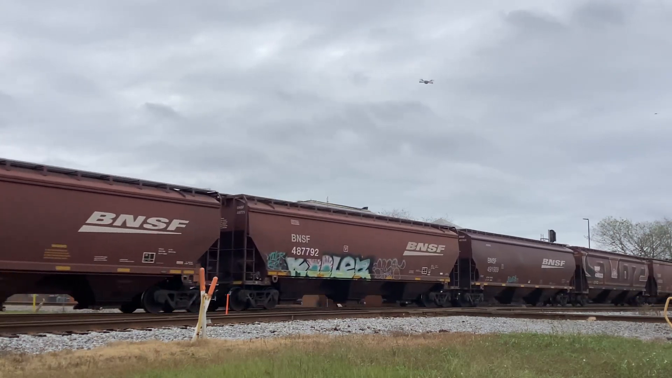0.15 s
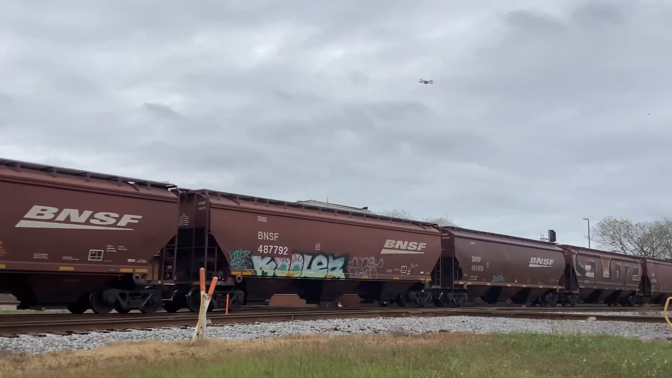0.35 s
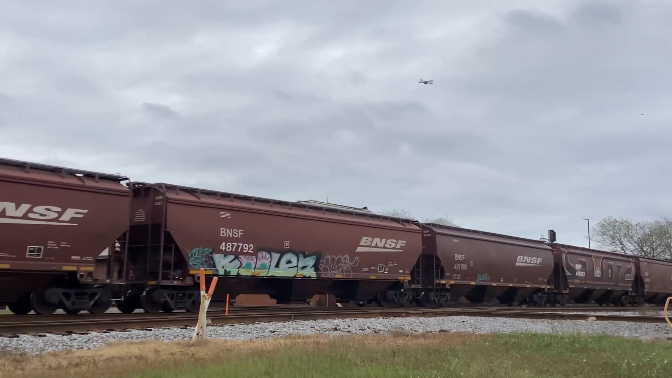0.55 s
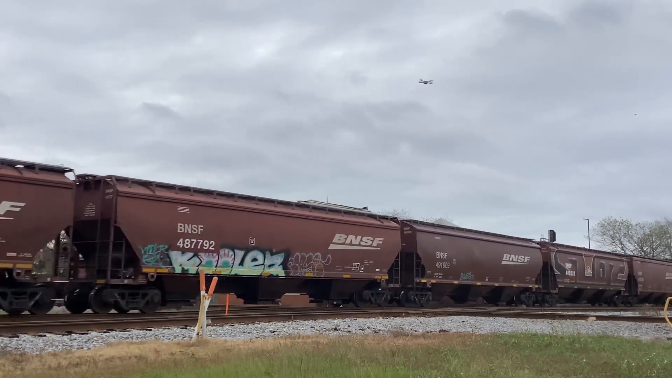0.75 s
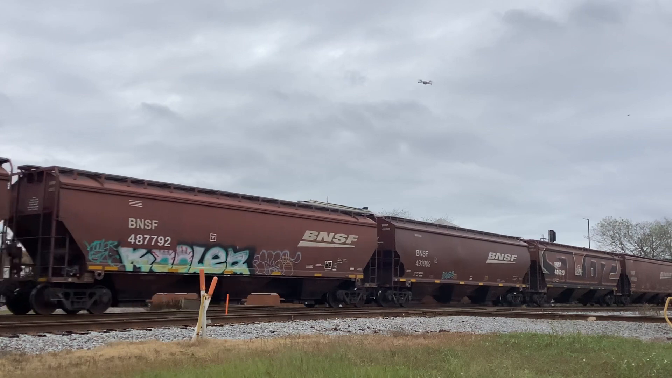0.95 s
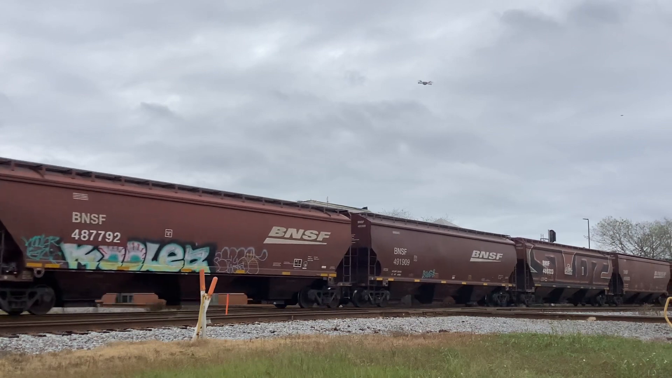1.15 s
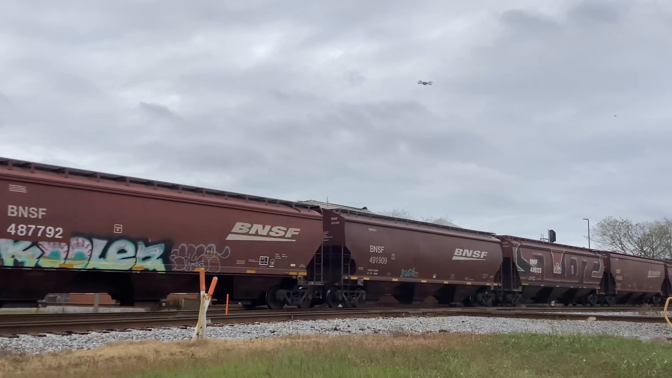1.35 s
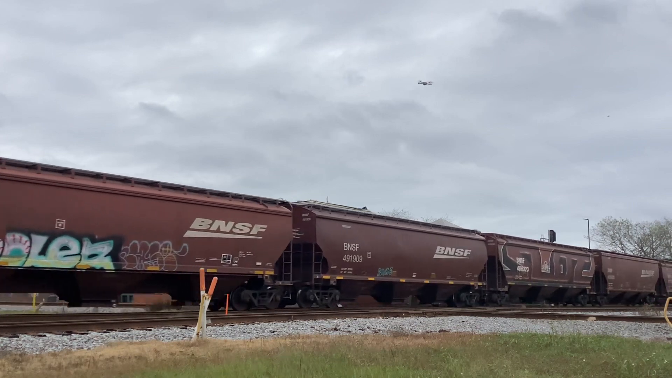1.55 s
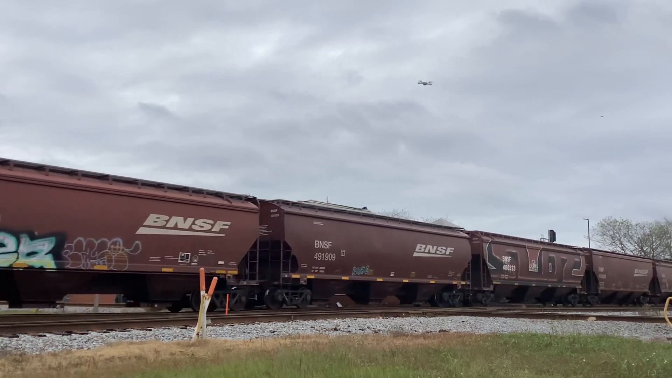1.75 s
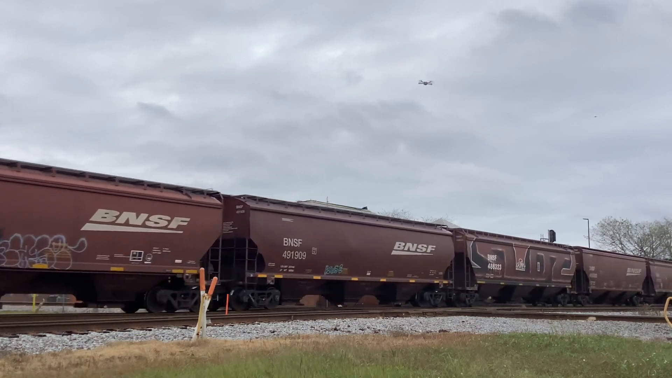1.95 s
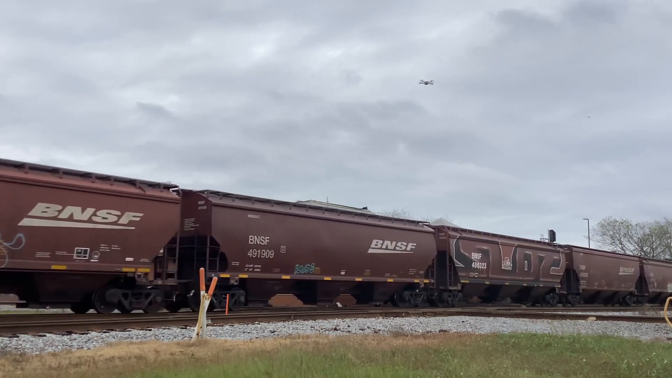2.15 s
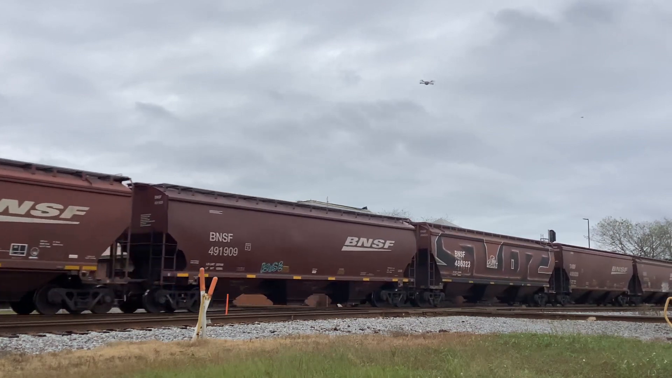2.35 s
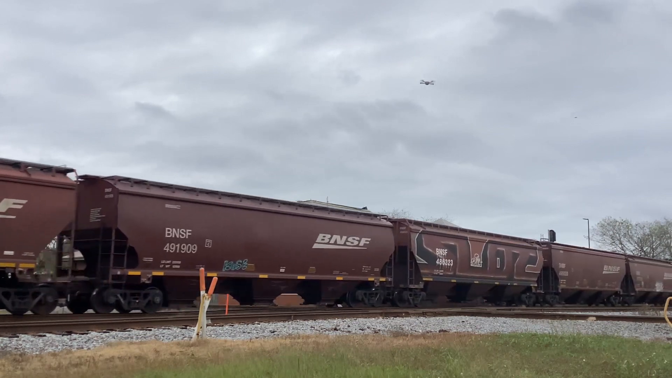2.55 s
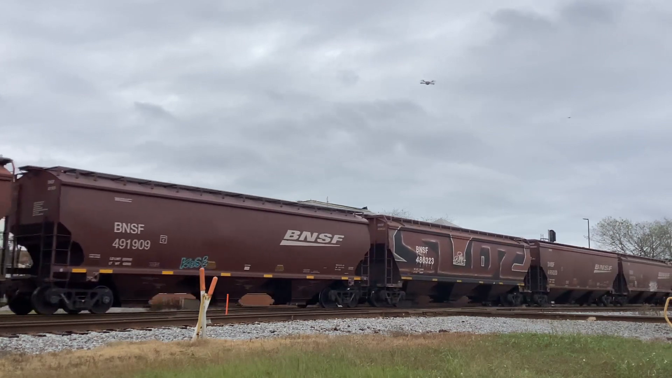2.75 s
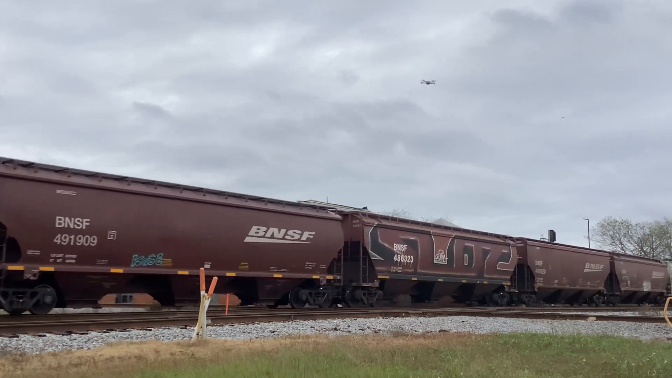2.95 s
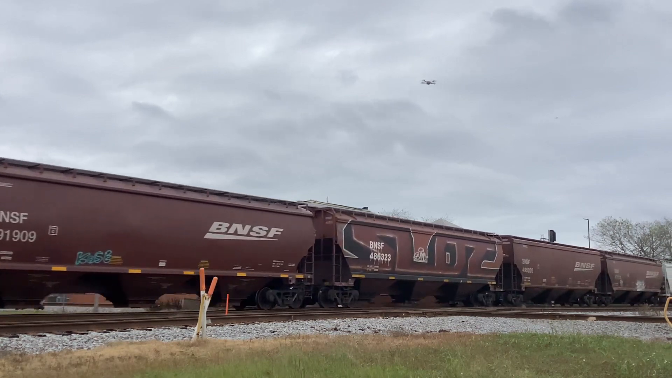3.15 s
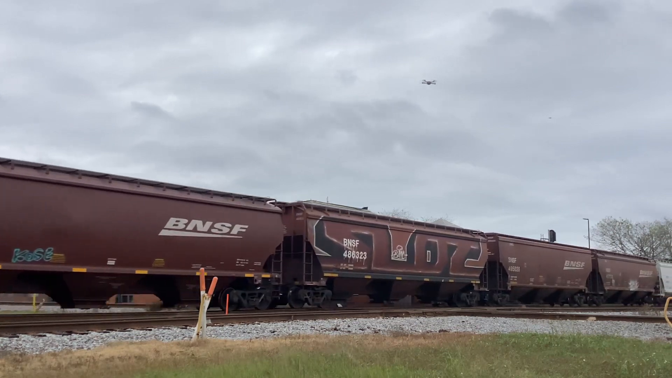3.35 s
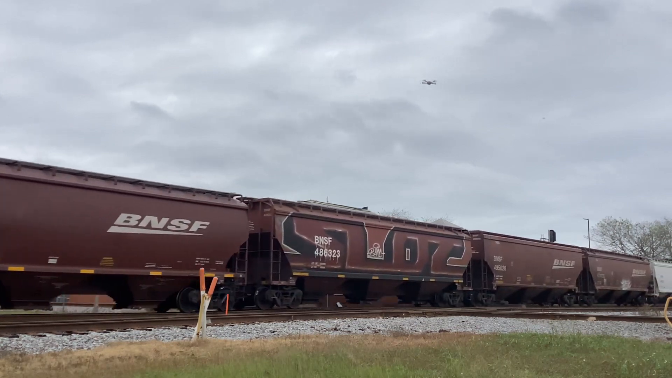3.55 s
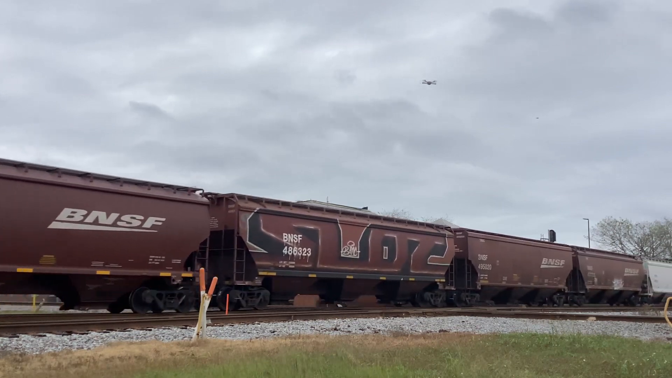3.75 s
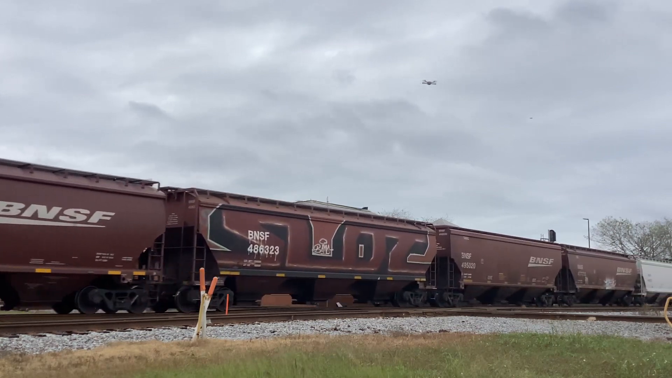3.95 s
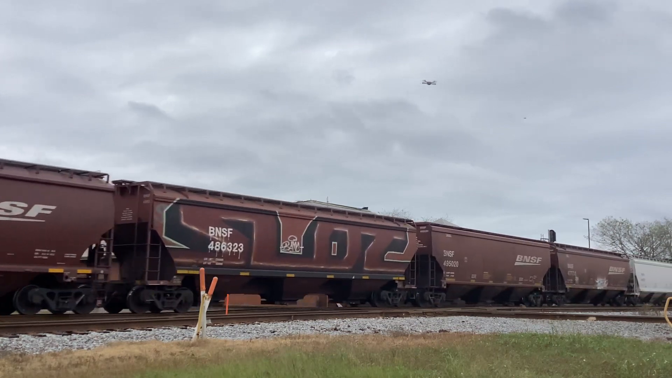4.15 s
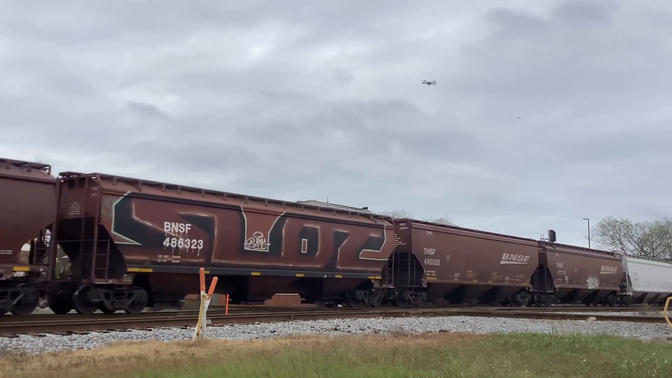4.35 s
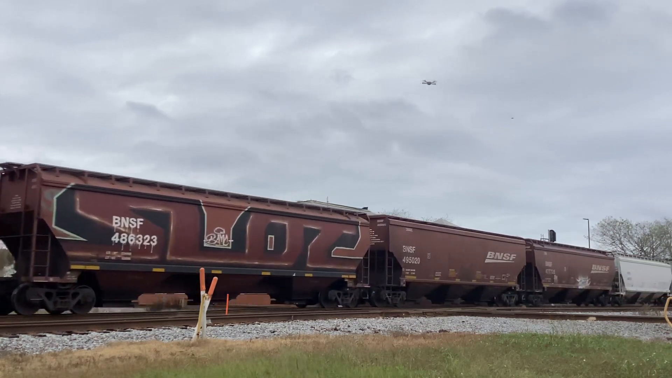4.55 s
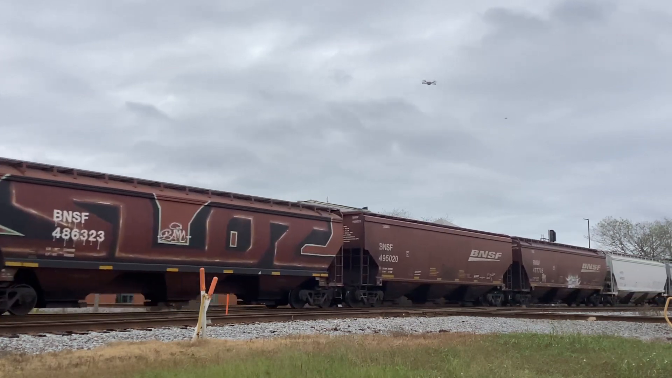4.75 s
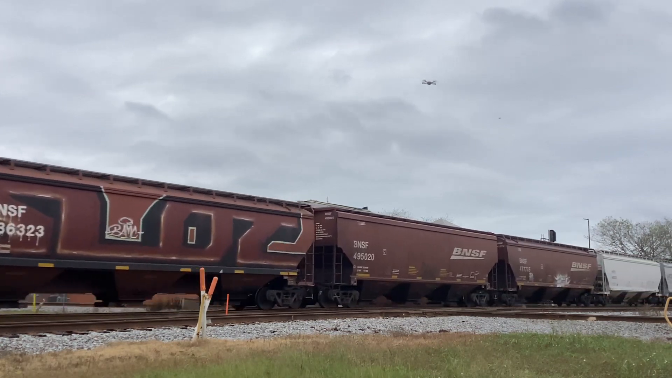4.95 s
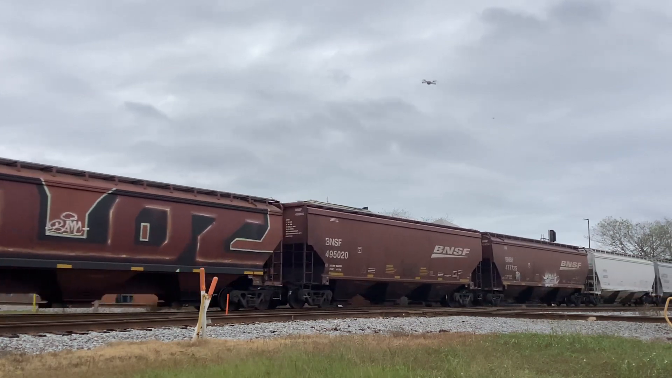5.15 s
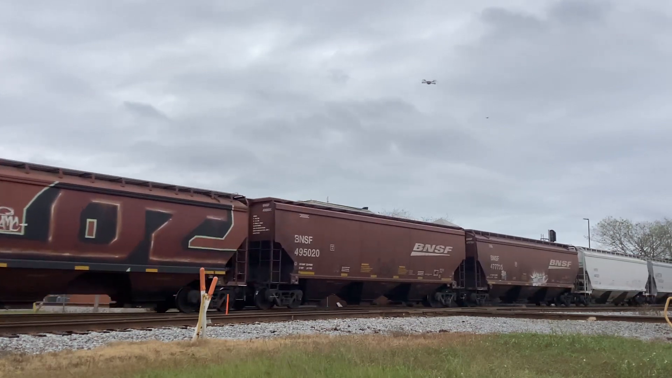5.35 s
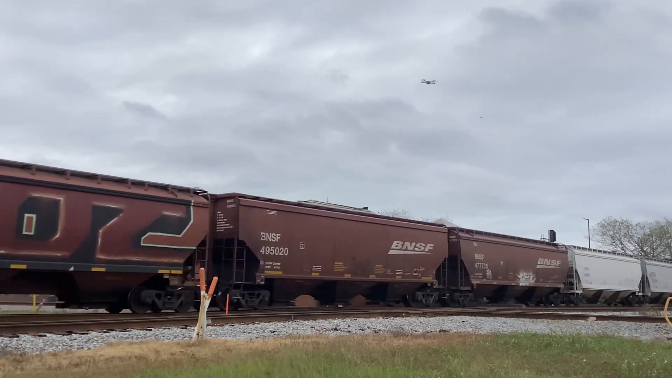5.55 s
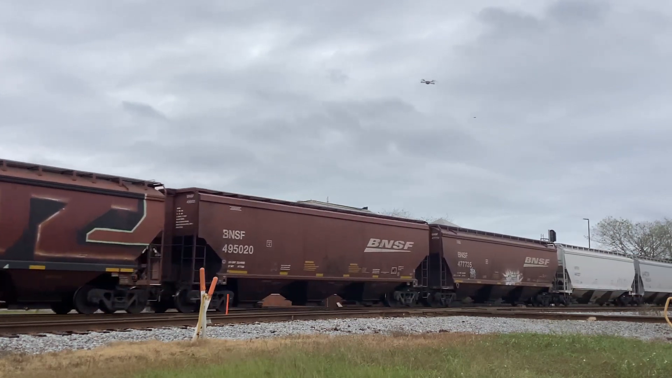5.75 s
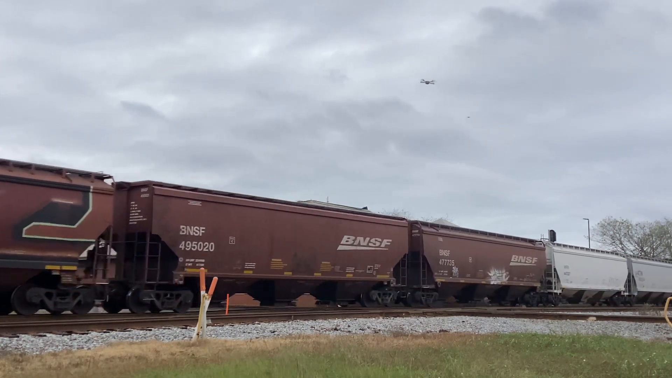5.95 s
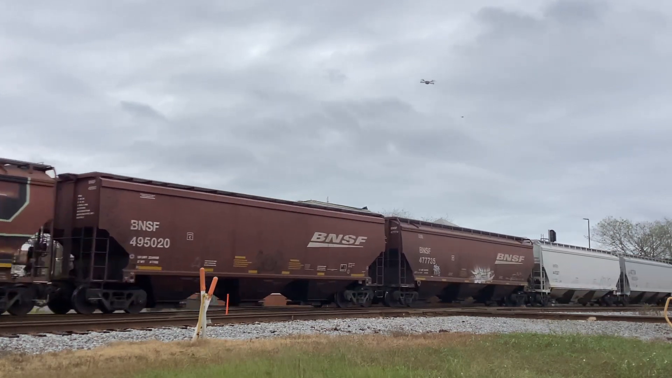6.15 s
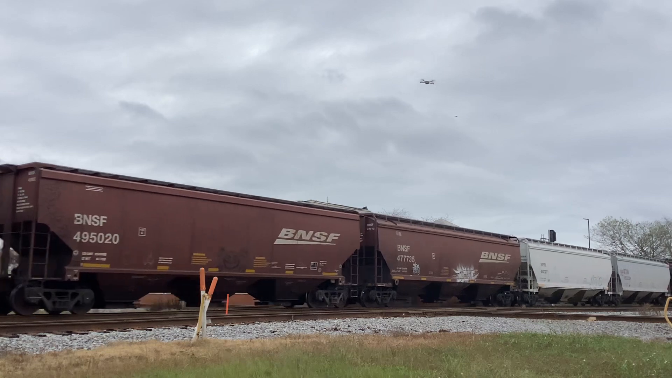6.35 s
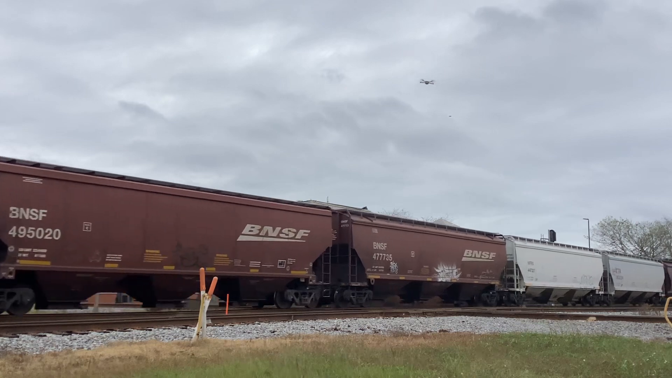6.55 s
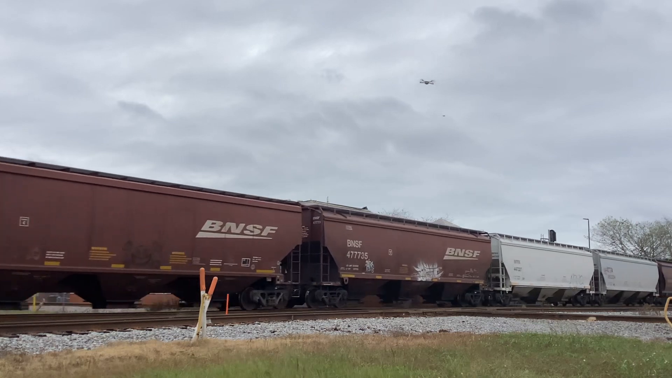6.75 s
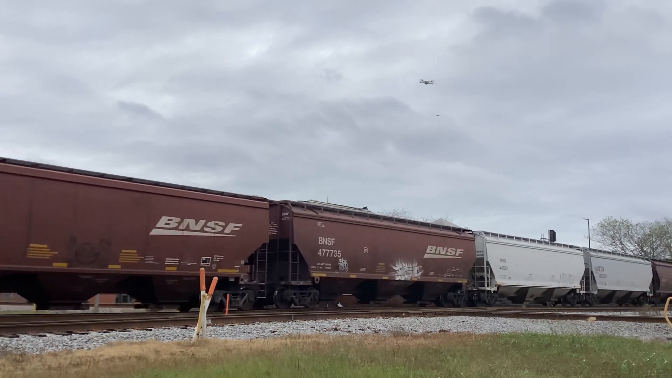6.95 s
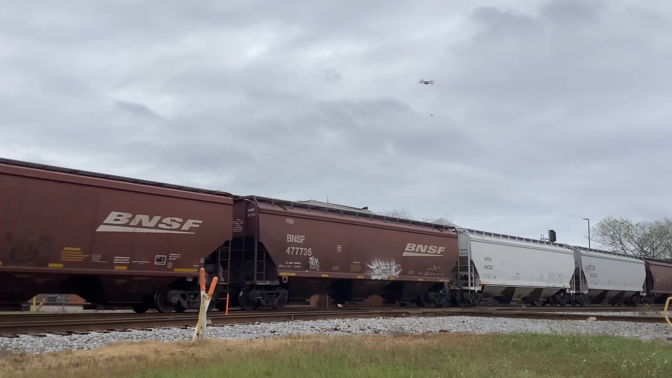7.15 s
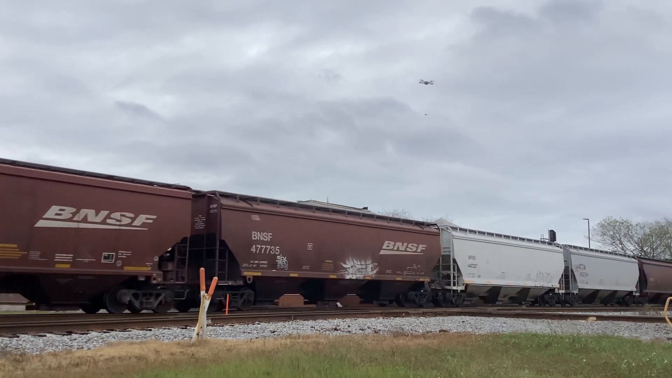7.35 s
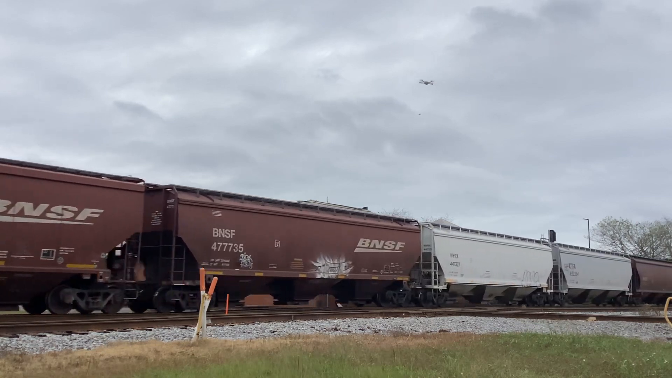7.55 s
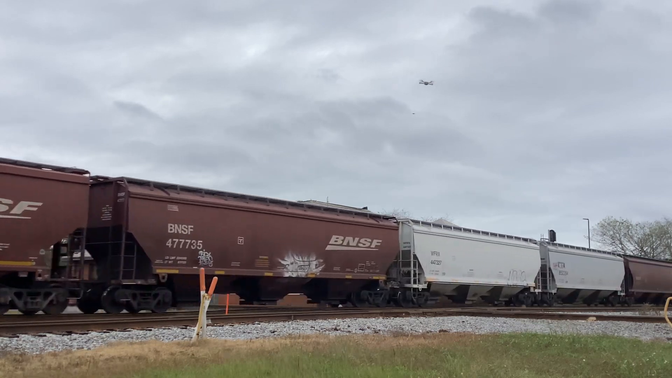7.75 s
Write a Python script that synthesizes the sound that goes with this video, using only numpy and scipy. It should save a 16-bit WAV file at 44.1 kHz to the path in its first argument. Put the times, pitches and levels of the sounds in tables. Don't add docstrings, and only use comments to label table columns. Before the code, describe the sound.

Close trackside pass of a long goods train: four groups of booming metallic double clanks over steady rumble and hiss, opening with pulsing wheel squeal.

```python
import sys
import numpy as np
from scipy import signal
from scipy.fft import rfft, irfft, next_fast_len
from scipy.io import wavfile

SR = 44100
rng = np.random.default_rng(int(sys.argv[2]) if len(sys.argv) > 2 else 0)


def unload_wav(signal):
    wavfile.write(
        sys.argv[1],
        SR,
        np.round(np.clip(np.atleast_2d(signal).T, -1, 1) * 32767).astype(np.int16),
    )


def to_linear_factor(level_db):
    exponent = np.asarray(level_db, float) / 20
    return 10 ** exponent


N = 343539


def rms_one(x):
    return x / np.sqrt(np.mean(x ** 2) + 1e-20)


def drift(rate_hz, size=N):
    r = np.exp(-80 * np.pi * rate_hz / SR)
    white = rng.standard_normal(size // 40 + 2002)
    slow = signal.lfilter([1], [1, -2 * r, r * r], white)[2000:]
    return np.interp(np.arange(size) / 40, np.arange(len(slow)), rms_one(slow))


def coloured(spectrum, patchy_db, count, shared=0.68, rate_hz=15.0):
    size = next_fast_len(N)
    hz, db = np.transpose(spectrum)
    log_hz = np.log(np.arange(1, size // 2 + 2) * SR / size)
    bins = rfft(rng.standard_normal(size)) * to_linear_factor(np.interp(log_hz, np.log(hz), db, -120, -120))
    centres = np.linspace(np.log(hz[0]), np.log(hz[-1]), count)
    together = drift(10.8)
    out = 0
    for k in range(count):
        share = np.interp(log_hz, centres, np.arange(count) == k)
        flicker_db = patchy_db * (shared * together + drift(rate_hz))
        out = out + irfft(bins * share, size)[:N] * to_linear_factor(flicker_db)
    return rms_one(out)


def clicks(s, db):
    train = np.full(N, 1e-18)
    train[np.round(np.asarray(s) * SR).astype(int)] = to_linear_factor(db)
    return train


def swell(train, rise_s, t60_s, tail_t60_s, tail_db):
    fast, tail = [signal.lfilter([1], [1, -to_linear_factor(-120 / (t * SR))], train ** 2) for t in (t60_s, tail_t60_s)]
    r = np.exp(-1 / (rise_s * SR))
    return np.sqrt(signal.lfilter([(1 - r) ** 2], [1, -2 * r, r * r], fast + to_linear_factor(2 * tail_db) * tail))


def approach(train, lead_s, lead_db):
    backwards = signal.lfilter([1], [1, -np.exp(-1 / (lead_s * SR))], train[::-1])
    return to_linear_factor(lead_db) * backwards[::-1]


def ring(train, hz, t60_s):
    r, w = to_linear_factor(-60 / (t60_s * SR)), 2 * np.pi * hz / SR
    return signal.lfilter([0, np.sin(w)], [1, -2 * r * np.cos(w), r * r], train)


def add(out, s, sound):
    at = round(s * SR)
    out[at:at + len(sound)] += sound[:N - at]


def blow_rows():
    # (time at first gap [s], first blow [dB], second blow [dB])
    axles = [(0.934, -6, -7), (1.119, -8, -7.5), (1.329, -8.5, -5.5), (1.513, -9.5, -7), (2.68, -7, -3.5),
             (2.865, -11.5, -8), (3.082, -9, -5), (3.258, -9.5, -6), (4.481, -5.5, -3.5), (4.662, -5.5, -6),
             (4.879, -5, -5), (5.058, -6, -6.5), (6.195, -5.5, -3), (6.376, -8, -8.5), (6.595, -5.5, -6),
             (6.771, -5, -4.5)]
    # (extra boom [dB], extra treble [dB], extra wagon body [dB])
    wheels = [(-3.5, 1.5, -1), (1, 1.8, 1.5), (2, 1, -1), (-7, 0.3, 4.5), (0.5, -1, -3.5), (-2, -0.5, -0.5),
              (-1, 0, 1.5), (-1, -2, 2), (-1, 1, 1), (2.3, 1.5, 1.5), (-2, 0.2, 2), (4, -1, 3.5),
              (-0.5, 1.8, 1.5), (-0.5, 4.5, 2), (1, 1, -1), (-1, 0.8, -3)]
    # (boom [dB], treble [dB], wagon body [dB])
    shake = [
        (-14, -16.5, -18.5),
        (-12.5, -15, -16.5),
        (-16.5, -19, -21.5),
        (-15, -17, -17),
        (-15.5, -16.5, -21.5),
        (-14.5, -16, -16),
        (-13.5, -15, -20.5),
        (-18, -14.5, -21),
    ]
    gap_lag_s, lag_shrink_per_s = 0.1425, 0.0007
    hits = []
    for (s, first_db, second_db), extra_db in zip(axles, wheels):
        hits.append((s, first_db, *extra_db))
        hits.append((s + gap_lag_s - lag_shrink_per_s * s, second_db, *extra_db))
    shared = [(0, 0, *shake_db) for shake_db in shake]
    return np.array(hits) + np.tile(shared, (len(hits) // len(shake), 1))


def crashes():
    # (time [s], peak [dB], treble [dB])
    knocks = [
        (0.209, -36, -32),
        (0.359, -17, -24),
        (2.036, -32, -45),
        (2.3, -31, -32),
        (2.37, -31, -39),
        (3.719, -19.5, -23.5),
        (5.489, -28, -31),
        (5.659, -26, -21.5),
        (5.739, -15, -40),
        (7.519, -27, -25),
    ]
    # (frequency [Hz], density [dB per Hz])
    boom_colour = [(15, -59), (25, -50), (59, 2), (129, 1.5), (175, -0.5), (231, -6.5), (284, -20),
                   (325, -33), (450, -26), (580, -25), (990, -120)]
    body_colour = [(140, 1), (230, -4.5), (285, 4), (323, 0.5), (471, -12.5), (700, -5), (910, -35),
                   (1540, -120)]
    crash_colour = [(350, -2), (600, 0.5), (879, -1), (992, 1), (1200, -1), (1630, 1), (1860, 0.5),
                    (2150, -5), (2750, -4.5), (2980, -9), (3320, -12), (3600, -13.5), (4680, -44),
                    (7920, -120)]
    splash_colour = [(1880, -34), (3200, 0), (3610, -21), (3920, 0), (4270, -3), (5200, 4), (6320, -2),
                     (7780, 1), (8910, -3), (9400, 3), (9790, 2), (13200, -10), (15000, -20), (16000, -35)]
    s, crash_db, boom_db, treble_db, body_db = np.transpose(blow_rows())
    knock_s, knock_db, knock_treble_db = np.transpose(knocks)

    low = clicks(s, boom_db - 5.5)
    boom = np.hypot(swell(low, 0.0058, 0.32, 1.0, -3), approach(low, 0.015, -1.0))
    boom = boom * coloured(boom_colour, 2.7, count=4)

    panel = clicks(s, body_db)
    body = np.hypot(swell(panel, 0.0042, 0.21, 0.27, -14.0), approach(panel, 0.011, -1.5))
    body = body * coloured(body_colour, 2.0, count=2)

    mid = clicks(s[::2], crash_db[::2] - 8.5) + clicks(knock_s, knock_db - 16.0)
    crash = np.hypot(swell(mid, 0.001, 0.35, 1.0, -15.0), approach(mid, 0.022, -11.5))
    worn = clicks(s[1::2] - 0.002, crash_db[1::2] - 9.5)
    worn_burst = np.hypot(swell(worn, 0.0022, 0.39, 0.94, -11.0), approach(worn, 0.013, -7))
    crash = np.hypot(crash, worn_burst) * coloured(crash_colour, 1.5, count=7)

    treble = clicks(s - 0.0025, treble_db - 2) + clicks(knock_s, knock_treble_db - 7.5)
    splash = swell(treble, 0.0043, 0.42, 1.0, -6.5) * coloured(splash_colour, 0.99, count=6)

    clatter = to_linear_factor(0.88 * drift(75))
    return boom + body + clatter * (crash + splash)


def thuds():
    # (time of peak [s], peak [dB], frequency [Hz])
    gives = [(0.95, -12, 162), (1.092, -6.5, 184), (1.114, -13, 179), (1.135, -8.5, 207), (1.174, -16, 147),
             (1.265, -9, 197), (1.291, -10, 127), (1.347, -6.5, 190), (1.399, -16, 108), (1.487, -11, 219),
             (1.511, -12, 170), (1.535, -5, 140), (1.668, -9.5, 207), (2.706, -8, 125), (2.837, -7.5, 180),
             (2.882, -4.5, 167), (2.915, -12, 122), (3.018, -24, 206), (3.062, -10, 131),
             (3.094, -2.5, 145), (3.234, -8, 146), (3.273, -13, 163), (3.314, -10, 104), (3.362, -14, 131),
             (3.391, -15, 114), (4.501, -11, 120), (4.635, -17, 191), (4.68, -5, 151), (4.713, -19, 113),
             (4.831, -6, 116), (4.87, -13, 112), (4.899, -11, 141), (4.916, -21, 110), (5.038, -14, 170),
             (5.071, -4, 128), (5.093, -18, 184), (5.124, -10, 120), (5.21, -9, 191), (5.236, -6.5, 109),
             (6.213, -11.5, 131), (6.348, -11, 156), (6.368, -16, 183), (6.396, -10, 132), (6.416, -9, 97),
             (6.53, -11, 203), (6.547, -10, 115), (6.565, -12, 130), (6.606, -5, 196), (6.637, -11.5, 126),
             (6.701, -17, 109), (6.744, -4.5, 166), (6.787, -5.5, 165), (6.81, -13, 158), (6.923, -9, 155)]
    cycles_to_peak, sag = 1.203, 0.21
    out, t = np.zeros(N), np.arange(round(0.12 * SR)) / SR
    for (s, peak_db, hz), phase in zip(gives, rng.random(len(gives))):
        rise_s = cycles_to_peak / hz
        turns = hz * ((1 - sag) * t + 3 * sag * rise_s * (1 - np.exp(-t / rise_s)))
        push = (t / rise_s) ** 2 * np.exp(2 - 2 * t / rise_s)
        add(out, s - rise_s, to_linear_factor(peak_db) * push * np.sin(2 * np.pi * (turns + phase)))
    return out


def steel():
    # (frequency [Hz], level [dB], rattle t60 [s])
    steel_modes = [(986, -30.5, 0.34), (1635, -25, 0.31), (1852, -34.5, 1), (2602, -23, 0.71),
                   (5100, -28, 0.96), (5500, -33, 0.32), (9740, -16, 0.33)]
    mode_t60_s = [.06, .06, .08, .035, .025, .02, .008]
    s, crash_db = np.transpose(blow_rows())[:2]
    spread_db = 3 * rng.standard_normal((len(s), len(steel_modes)))
    out = 0
    for k, (hz, level_db, rattle_t60_s) in enumerate(steel_modes):
        train = clicks(s, crash_db + level_db + spread_db[:, k] - 21.5)
        rattle = swell(train, 0.0072, rattle_t60_s, 1.0, -4)
        out = out + ring(rattle * rng.standard_normal(N), hz, mode_t60_s[k])
    return out


def wheel_notes():
    # (time [s], frequency [Hz], peak [dB], t60 [s])
    clear_notes = [(1.078, 5167, -23, 0.11), (1.263, 5280, -21, 0.07), (1.324, 1894, -23, 0.08),
                   (2.676, 1640, -17, 0.063), (2.684, 2460, -23, 0.1), (2.82, 948, -18, 0.13),
                   (2.824, 1648, -23, 0.33), (2.86, 1625, -21, 0.23), (2.881, 1141, -21, 0.09),
                   (3.077, 1590, -21, 0.08), (3.083, 432, -19.5, 0.16), (3.169, 1475, -21.5, 0.08),
                   (3.215, 633, -18, 0.068), (3.261, 1890, -20, 0.15), (3.394, 1894, -32, 0.12),
                   (4.615, 1076, -19, 0.14), (4.627, 1680, -22, 0.08), (4.651, 2620, -29, 0.09),
                   (4.669, 1600, -20, 0.097), (4.895, 1005, -22, 0.09), (4.899, 2830, -17, 0.09),
                   (4.931, 1000, -22, 0.22), (5.015, 1880, -24, 0.08), (6.326, 1830, -24, 0.35),
                   (6.523, 1850, -25, 0.16), (6.595, 1674, -16, 0.14), (6.597, 745, -17, 0.099),
                   (6.733, 1900, -15, 0.1), (6.769, 1426, -13.5, 0.076), (6.906, 1442, -16, 0.11),
                   (6.906, 1837, -24, 0.16)]
    out, t = np.zeros(N), np.arange(round(0.3 * SR)) / SR
    for (s, hz, peak_db, t60_s), phase in zip(clear_notes, rng.random(len(clear_notes))):
        note = (1 - np.exp(-t / 0.0029)) ** 2 * to_linear_factor(-60 * t / max(t60_s, 0.04))
        add(out, s, to_linear_factor(peak_db + 2.0) * note / note.max() * np.sin(2 * np.pi * (hz * t + phase)))
    hum = np.sin(np.pi * t / 0.3) ** 2 * to_linear_factor(-60 * t / 0.5) * np.sin(2 * np.pi * 350 * t)
    for s, *_ in blow_rows()[7:16:8]:
        add(out, s, to_linear_factor(-15.5) * hum)
    return out


def wheel_modes(count):
    out, t = np.zeros(N), np.arange(round(0.2 * SR)) / SR
    rows = blow_rows()
    chance = rng.random((len(rows), 4, count, 1))
    for (s, crash_db, _, treble_db, _), (pitch, strength, damping, phase) in zip(rows, chance):
        hz = 450 * (12000 / 450) ** pitch ** 0.65
        level_db = crash_db - 21.5 + pitch * (treble_db - crash_db + 8) - 12 * strength
        fall = to_linear_factor(level_db - 60 * t / (0.091 + 0.25 * damping))
        tones = np.sum(fall * np.sin(2 * np.pi * (hz * t + phase)), axis=0)
        add(out, s, (1 - np.exp(-t / 0.0062)) * tones)
    return out


def squeal(rows, glide_hz, wobble_hz, flutter_db, skirt_hz, above_hz):
    start, end = round(rows[0][0] * SR), round(rows[-1][0] * SR)
    step = np.arange(end - start)
    s, *levels_db = np.transpose(rows)
    tone_db, skirt_db = [np.interp((start + step) / SR, s, db) for db in levels_db]
    fade = np.minimum(step + (start == 0) * SR, step[::-1]) / (0.016 * SR)
    hz = np.linspace(*glide_hz, len(step)) + wobble_hz * drift(21.1, size=len(step))
    tone_amp = np.sqrt(2) * to_linear_factor(tone_db + flutter_db * drift(35, size=len(step)))
    tone = tone_amp * np.sin(2 * np.pi * np.cumsum(hz) / SR)
    centre_hz = np.mean(glide_hz) + above_hz
    band_hz = [centre_hz - skirt_hz / 2, centre_hz + skirt_hz / 2]
    band = signal.butter(2, band_hz, "band", fs=SR, output="sos")
    skirt = to_linear_factor(skirt_db) * rms_one(signal.sosfilt(band, rng.standard_normal(len(step))))
    return np.pad(np.clip(fade, 0, 1) * (tone + skirt), (start, N - end))


def with_skirt(rows, skirt_db):
    ends_s = (rows[0][0], rows[-1][0])
    return [(s, db, np.interp(s, ends_s, skirt_db)) for s, db in rows]


def squeals():
    # (time [s], tone [dB])
    low_rows = [
        [(0.0, -43), (0.09, -21), (0.225, -28), (0.245, -44), (0.33, -22.5), (0.52, -30), (0.645, -23),
         (0.85, -25.5), (0.895, -40), (1.02, -34)],
        [(1.15, -41), (1.23, -35), (1.29, -37), (1.33, -48), (1.472, -28), (1.528, -46), (1.6, -34), (1.7, -42)],
        [(1.81, -40), (1.84, -29), (1.94, -26), (2.082, -26.5), (2.18, -37), (2.24, -36), (2.35, -47),
         (2.59, -35), (2.64, -50)],
    ]
    high_rows = [
        [(0.0, -27), (0.17, -25.5), (0.278, -37), (0.348, -20.5), (0.47, -27), (0.554, -26.5), (0.66, -37),
         (0.77, -29), (1.08, -37)],
        [(4.08, -62), (4.122, -42), (4.236, -52), (4.304, -39), (4.366, -50), (4.47, -41)],
    ]
    # (start [Hz], end [Hz])
    low_glides_hz = [(3240, 3226), (3228, 3224), (3227, 3222)]
    high_glides_hz = [(7686, 7634), (7628, 7608)]
    # (start [dB], end [dB])
    low_skirts_db = [(-28.5, -35.5), (-46.5, -43), (-36.5, -39.5)]
    high_skirts_db = [(-28, -39), (-58, -40)]
    out = np.zeros(N)
    for rows, skirt_db, glide_hz in zip(low_rows, low_skirts_db, low_glides_hz):
        out += squeal(with_skirt(rows, skirt_db), glide_hz, 2.16, 1.1, 157, 36)
    for rows, skirt_db, glide_hz in zip(high_rows, high_skirts_db, high_glides_hz):
        out += squeal(with_skirt(rows, skirt_db), glide_hz, 1.8, 2.3, 320, 110)
    return out


def whistles():
    # (start [s], peak [s], end [s], tone peak [dB], rough neighbours [dB])
    whistle_rows = [(.35, .58, .72, -39, -52), (1.88, 2.032, 2.08, -35, -58), (1.85, 2.03, 2.2, -37, -50),
                    (.3, .4, .9, -50, -60), (.08, .36, .6, -47, -41), (1.95, 2.15, 2.6, -52, -49),
                    (.05, .12, .22, -46, -48), (1.95, 2.27, 2.58, -34, -44), (.02, .12, .5, -41, -46),
                    (3.5, 3.65, 3.85, -54, -46), (7.17, 7.22, 7.28, -56, -54)]
    whistle_pitch_hz = [12730, 13330, 11012, 13755, 6850, 11700, 12700, 3360, 3350, 2600, 15000]
    out = np.zeros(N)
    for hz, (start_s, peak_s, end_s, peak_db, skirt_db) in zip(whistle_pitch_hz, whistle_rows):
        edge_db = peak_db - 12
        rows = [(start_s, edge_db, skirt_db), (peak_s, peak_db, skirt_db), (end_s, edge_db, skirt_db - 2)]
        out += squeal(rows, (hz, hz - 13.7), 34, 6, 260, 15)
    return out


def rail_ring():
    # (time [s], level [dB])
    rail_levels = [
        (3.5, -26),
        (3.802, -33),
        (3.828, -42),
        (3.934, -32),
        (4.002, -52),
        (4.08, -44),
        (4.12, -65),
    ]
    return squeal([(s, db - 18, db - 11) for s, db in rail_levels], (5010, 4995), 30, 6, 300, 15)


def coupling_moan():
    # (time [s], level [dB])
    moan_levels = [
        (.28, -45),
        (.36, -38),
        (.46, -45),
        (.56, -40),
        (.64, -50),
    ]
    return squeal([(s, db - 2, db - 5) for s, db in moan_levels], (790, 1330), 45, 4, 500, 0)


def nearness():
    rise_s, fall_s, lead_s, hold_s = 0.22, 0.18, 0.11, 0.029
    t = np.arange(N) / SR
    s = np.reshape(blow_rows(), (-1, 8, 5))[:, :, :1]
    rise = (t - s[:, 0] + lead_s) / rise_s
    fall = (s[:, -1] + hold_s + fall_s - t) / fall_s
    return np.clip(np.minimum(rise, fall), 0, 1).max(axis=0)


def rolling_db():
    # (time [s], rolling roughness [dB], flange pressure [dB])
    contact = [(0, 1, -20), (.3, 0.5, -17), (.85, -1.5, -23), (1.36, 0, -27.5), (1.54, 0.5, -15.5),
               (1.86, 0, -32), (2.23, -0.5, -27.5), (2.55, -2, -34.5), (3.2, 2, -31.5), (3.7, -0.5, -37.5),
               (4.3, -2, -40), (5.0, 2.5, -36), (5.7, 4, -33), (5.97, -1, -39.5), (6.12, 4, -24),
               (6.5, 1, -33), (7.2, 1.6, -36), (7.79, 1.7, -36)]
    # (level [dB], share of roughness [1], share of flange pressure [1], gain with bogies near [dB])
    layer_rows = [
        (-28.5, 0.62, .01, 3.5),
        (-33.5, 0.97, .01, 6.5),
        (-37, 1, 0.13, 7.5),
        (-33.5, .01, 0.63, 0.5),
    ]
    s, rough_db, flange_db = np.transpose(contact)
    t = np.arange(N) / SR
    rough_db = np.interp(t, s, rough_db)
    flange_db = np.interp(t, s, flange_db) + 33
    near = nearness()
    return [db + a * rough_db + b * flange_db + near_db * near for db, a, b, near_db in layer_rows]


def rolling(levels_db):
    # (frequency [Hz], density [dB per Hz])
    rumble_colour = [(15, -73), (25, -45), (43, -27), (63, -4.5), (87, 1), (124, -4.5), (188, -6),
                     (257, -15.5), (332, -25.5), (400, -38), (520, -58), (880, -120)]
    roar_colour = [(150, -1), (250, -4.5), (331, 1), (393, -3), (458, -3.5), (510, -3), (811, -1),
                   (1170, -2), (1360, -2), (3300, -11), (4290, -34), (7260, -120)]
    grind_colour = [(1650, -28), (2800, -8), (3080, -9), (3340, 2.5), (4410, 3.5), (5100, 3.5), (5530, 1),
                    (6320, 1.5), (7770, 2.5), (8800, -1), (11400, -47), (19400, -120)]
    hiss_colour = [(4710, -34), (8000, -7), (8280, -5), (8960, 5.5), (10500, 9), (11700, 0), (15400, -14),
                   (16000, -28)]
    rumble_db, roar_db, grind_db, hiss_db = levels_db
    rumble = to_linear_factor(rumble_db) * coloured(rumble_colour, 1.5, count=4)
    roar = to_linear_factor(roar_db) * coloured(roar_colour, 1.17, count=6)
    grind = to_linear_factor(grind_db) * coloured(grind_colour, 2.6, count=9, shared=0.5, rate_hz=16.0)
    hiss = to_linear_factor(hiss_db) * coloured(hiss_colour, 1.7, count=8, shared=0.4, rate_hz=12)
    return rumble + roar + grind + hiss


def chirps(layer_db, count, low_hz, span_hz, best_hz, under_db):
    out = np.zeros(N)
    for when, pitch, length, strength in rng.random((count, 4)):
        t = np.arange(round((0.037 + 0.15 * length) * SR)) / SR
        hz = low_hz + span_hz * pitch
        off_pitch_db = 2.6 * abs(hz - best_hz) / 1000
        level_db = layer_db[int(when * N)] - under_db - 12 * strength - off_pitch_db
        touch = np.sin(np.pi * t / t[-1]) * np.sin(2 * np.pi * hz * t)
        add(out, when * (N - 1) / SR, to_linear_factor(level_db) * touch)
    return out


def scene():
    blows = crashes() + thuds() + steel() + wheel_notes() + wheel_modes(count=28)
    singing = squeals() + whistles() + rail_ring() + coupling_moan()
    levels_db = rolling_db()
    scrapes = chirps(levels_db[3], count=400, low_hz=6000, span_hz=8500, best_hz=10200, under_db=14)
    scrapes += chirps(levels_db[2], count=300, low_hz=2200, span_hz=5500, best_hz=5200, under_db=11)
    train = blows + singing + rolling(levels_db) + scrapes
    return np.array([train, train])


def roll_off(x):
    return signal.sosfilt(signal.butter(12, 15750, fs=SR, output="sos"), x)


def record(dry):
    thin = signal.sosfilt(signal.butter(4, 45, "high", fs=SR, output="sos"), dry)
    rounded = 1.28 * np.tanh(thin / 1.52)
    return roll_off(rounded)


dry = scene()
out = record(dry)
unload_wav(out)
```